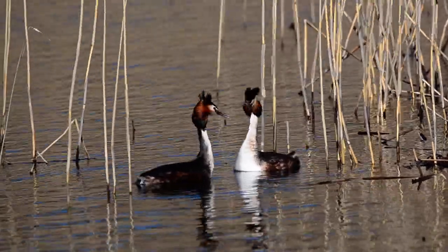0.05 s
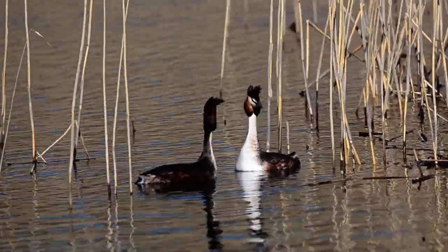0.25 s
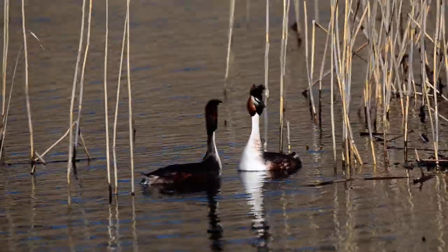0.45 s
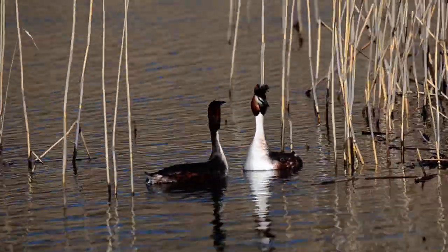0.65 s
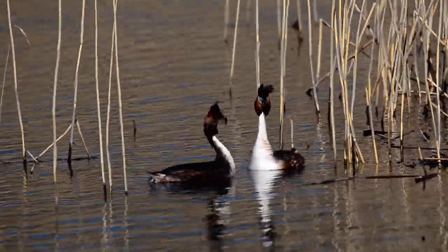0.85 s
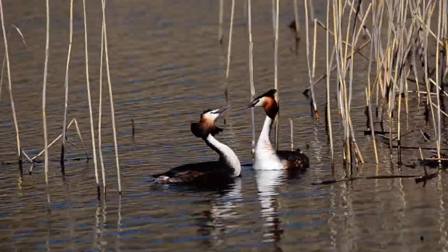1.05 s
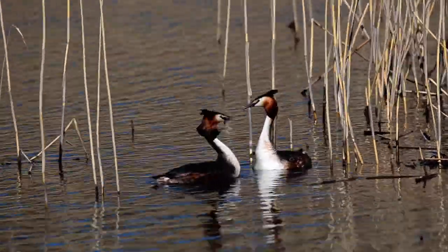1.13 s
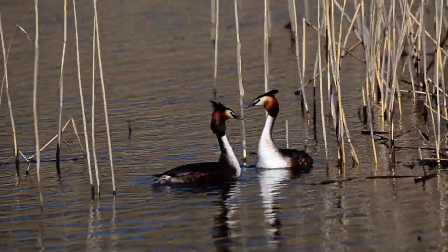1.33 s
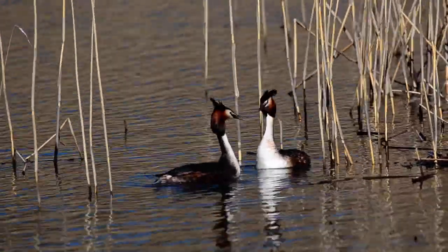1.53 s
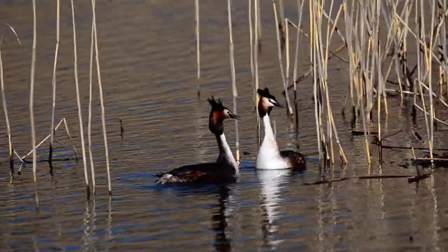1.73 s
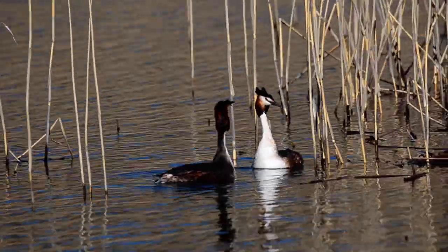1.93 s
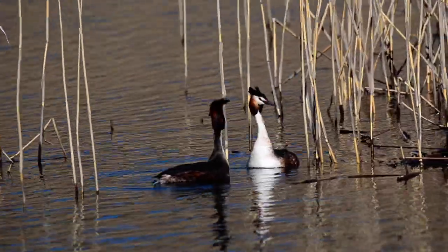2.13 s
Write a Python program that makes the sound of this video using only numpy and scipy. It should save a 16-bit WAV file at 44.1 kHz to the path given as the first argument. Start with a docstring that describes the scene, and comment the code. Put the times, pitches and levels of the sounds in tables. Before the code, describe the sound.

Three harsh rattling nasal grebe calls over a reedy pond, with wind thumping the microphone

```python
"""Grebes displaying on a reedy pond

Two great crested grebes give three harsh, rattling nasal calls, each a train of pulses arched in pitch.
Smoother nasal calls and thin whines from other birds overlap them, with two faint high whistles far off.
The reed bed scatters back a weak, dull tail of all the birds.
Wind strikes the microphone in short thumps, over a low rumble and a distant rush of shaped noise."""
import sys
import numpy as np
from scipy import signal
from scipy.fft import rfft, irfft
from scipy.io import wavfile

SR = 44100
rng = np.random.default_rng(int(sys.argv[2]) if len(sys.argv) > 2 else 0)


def transcribe(signal):
    """Save signal, clipped to [-1, 1], as a 16-bit WAV file at the path in sys.argv[1]."""
    frames = np.atleast_2d(signal).T
    limited = np.clip(frames, -1, 1)
    pcm = np.round(limited * 32767).astype(np.int16)
    wavfile.write(sys.argv[1], SR, pcm)


N = 97020
TIME = np.arange(N) / SR

# Strength of the low wind rumble: [start_s, level_db]
WIND_LEVEL = [(0, -46), (.15, -45), (.23, -32.5), (.32, -36.5), (.35, -35.5), (.43, -36.5), (.5, -23.5),
              (.63, -33.5), (.69, -40), (.84, -39.5), (.94, -30.5), (1.11, -35.5), (1.18, -28), (1.35, -39),
              (1.47, -42.5), (1.6, -35.5), (1.68, -41), (1.78, -45), (1.85, -35.5), (2.05, -43.5),
              (2.2, -39.5)]
# Relative spectra of the wind rumble and the distant rush: [freq_hz, level_db per Hz]
RUMBLE_SPECTRUM = [(15, -21.5), (35, 0), (70, 6.5), (130, 2.5), (220, -1.5), (330, -17), (550, -19.5),
                   (1000, -40.5), (3000, -74.5), (9000, -110)]
RUSH_SPECTRUM = [(60, 0), (250, -8.5), (550, -12.5), (900, 1), (1300, -5.5), (1700, -11), (2200, -17.5),
                 (3000, -28.5), (4000, -37.5), (5500, -45.5), (8000, -49), (15500, -53.5)]
# Thin whines of other birds: [start_s, pitch_hz, level_db]
WHINE_CURVES = [
    [(0, 2240, -63), (.09, 2173, -62.5), (.125, 2200, -60.5), (.145, 2020, -50.5), (.19, 1835, -53.5)],
    [(1.2, 2310, -60.5), (1.25, 2280, -73), (1.275, 2060, -55), (1.32, 1960, -51), (1.345, 2150, -57.5),
     (1.39, 2250, -60.5)],
]
# Eddies striking the microphone: [centre_s, swing_peak_db, pitch_hz, turbulence_db]
WIND_EDDIES = [(0.027, -31.5, 108, -37), (0.212, -18, 414, -22.5), (0.2161, -17.5, 266, -22.5),
               (0.2219, -14.5, 171.5, -31.5), (0.276, -23.5, 140, -37), (0.312, -22, 140, -29),
               (0.388, -15, 92, -31), (.397, -19.5, 187, -32), (0.446, -25, 417, -35.5),
               (0.4702, -8.5, 235, -23.5), (0.489, -18, 261, -20), (0.516, -17, 109.4, -30),
               (.5288, -9.5, 324, -21), (0.5322, -11, 687, -16), (.537, -13.5, 146.5, -19.5),
               (.556, -28.5, 450, -47), (.598, -13.5, 164, -24), (0.605, -15, 314, -28.5),
               (0.619, -20, 130, -40.5), (.635, -20, 110, -28), (.657, -20, 258, -29),
               (.756, -27, 129, -45), (0.812, -24.5, 189, -33), (0.861, -25.5, 151, -32),
               (0.874, -21, 122, -46), (0.892, -22.5, 140, -33.5), (0.906, -25.5, 278, -27),
               (0.922, -14.5, 110.6, -22.5), (0.936, -15.5, 101, -24), (.991, -19, 115, -26),
               (1.001, -14, 150, -29.5), (1.058, -18.5, 99, -39), (1.068, -19.5, 120, -28),
               (1.16, -22.5, 180, -34), (1.171, -17.5, 380, -28.5), (1.192, -23.5, 129.3, -23),
               (1.21, -20.5, 130, -34), (1.233, -21, 150, -26.5), (1.288, -26, 255, -27),
               (1.3, -19, 194, -34.5), (1.403, -32.5, 224, -38), (1.54, -19.5, 176, -26),
               (1.56, -27, 370, -33.5), (1.616, -24, 134, -33), (1.637, -21, 128, -42),
               (1.713, -31, 160, -51), (1.821, -28.5, 90, -59), (1.842, -30.5, 240, -48),
               (1.943, -30, 91, -52), (2.012, -26, 89, -55), (2.094, -27.5, 138, -56),
               (2.168, -30, 126, -47)]
# High whistles, far off: [start_s, pitch_hz, level_db before wavering]
WHISTLE_CURVES = [
    [(.185, 7450, -97), (.198, 7260, -88), (.212, 6600, -87), (.225, 6450, -74)],
    [(.555, 7050, -90), (.6, 7500, -111), (.645, 7600, -96), (.67, 7550, -99.5)],
]
# The three rattling calls: [start_s, pitch_hz before the pulse arch, level_db before throat colour,
# growl at half pitch (0-1)]
FIRST_RATTLE = [(.205, 900, -58, .1), (.26, 1005, -48.5, .1), (.305, 1055, -46.5, .05),
                (.345, 1025, -48, .05), (.425, 1068, -45.5, .1), (.49, 1045, -45.5, .05),
                (.53, 985, -47, .05), (.556, 890, -48.5, .1), (.595, 690, -56, .1)]
SECOND_RATTLE = [(.895, 880, -59, .2), (.945, 1025, -47, .1), (1.005, 1082, -44.5, .35),
                 (1.045, 1105, -45, .05), (1.095, 1112, -46, .65), (1.145, 1095, -46, .3),
                 (1.185, 1000, -47, .3), (1.207, 840, -51, .1), (1.24, 700, -59, .1)]
THIRD_RATTLE = [(1.56, 900, -56, .3), (1.585, 990, -45, .35), (1.61, 1035, -44, .3), (1.65, 1047, -44, .05),
                (1.69, 1037, -45.5, .6), (1.725, 1042, -44.5, .15), (1.765, 1035, -45.5, .65),
                (1.805, 1000, -46.5, .5), (1.84, 870, -56, .3)]
# Pulsing of each rattling call: [time of one gap_s, pulses_per_s, treble_db]
RATTLE_PULSES = [(0.3942, 49.3, -6.5), (1.057, 54, -.5), (1.6938, 49.8, 0.5)]
# Throat colour of the rattling calls: [freq_hz, gain_db]
RATTLE_THROAT = [(500, -30.5), (1050, -13), (1550, -7), (1800, 2.5), (2100, -2.5), (2600, -9.5),
                 (3150, -18.5), (3700, -8), (4200, -26.5), (4700, -31.5), (5250, -25), (6250, -24.5),
                 (7200, -35.5), (8000, -49), (8900, -43.5), (10500, -57), (12500, -49), (15000, -62.5)]
# Nasal calls of other birds: [start_s, pitch_hz before flutter, level_db before flutter and throat colour]
REPLY_CURVES = [
    [(.28, 878, -57.5), (.32, 904, -51), (.385, 945.4, -48), (.42, 830, -53), (.46, 708, -56.5)],
    [(1.44, 880, -58.5), (1.475, 912, -51.5), (1.51, 922.7, -50.5), (1.555, 911.5, -48.5),
     (1.595, 795, -51)],
]
# Throat colour of those nasal calls: [freq_hz, gain_db]
NASAL_THROAT = [(900, -6.5), (1500, 7), (1850, 2), (2750, -13), (3700, -19), (4600, -29), (5500, -45.5),
                (7500, -53.5)]
# Gain of the upper partials of each nasal call: [gain_db]
REPLY_TREBLE = [-3.5, -0.5]

RUSH_DB, RUSH_SWAY_DB = -45.5, 0.35
WHINE_JITTER, WHISTLE_JITTER = 0.018, .005  # rms shares of the pitch
WHISTLE_WAVER_DB = 2
SWIRL_RISE_S, SWIRL_FALL_S = 0.0039, 0.0078
# the swirl's upper limit is a base plus a share of the eddy's pitch
SWIRL_BASE_HZ, SWIRL_PITCH_SHARE, SWIRL_LOW_HZ = 202.3, 0.82, 39

# pulse times are shares of one pulse cycle; GAP_SHARE lies on each side of the gap's centre
GAP_SHARE, PULSE_EDGE, UPPER_EDGE = .035, .18, 0.092
GAP_DB = -13  # lower partials between pulses; the upper ones fall silent
# arch depth is a share of pitch; the skew tops it early; at the pivot height it leaves pitch unchanged
PULSE_ARCH, ARCH_SKEW, ARCH_PIVOT = .105, .9, 0.94
PULSE_WANDER, JITTER = .003, .005  # slow and fast rms shares of the pitch
SHIMMER_DB, RASP_DB = 1.12, -24
FULL_VOICE_HZ, TREBLE_DB_PER_OCTAVE = 1050, 19  # the voice dulls as its pitch sags

REPLY_FLUTTER_PER_S, REPLY_FLUTTER, REPLY_FLUTTER_DB, REPLY_JITTER = 78, .025, 4, .012
ECHO_DB, ECHO_T60_S, ECHO_CUT_HZ = -14.5, 0.38, 3000
CUTOFF_HZ, FADE_S = 15700, .004


def from_db(db):
    """Decibels to gain."""
    return 10 ** (np.asarray(db) / 20)


def rms_one(x):
    """Scale to unit rms."""
    return x / np.sqrt(np.mean(x ** 2) + 1e-20)


def in_time(rows):
    """Interpolate each column of a curve to every sample."""
    start_s, *columns = np.transpose(rows)
    return [np.interp(TIME, start_s, column) for column in columns]


def during(rows):
    """One while a call lasts, with 5 ms fades inside its ends."""
    from_edge_s = np.minimum(TIME - rows[0][0], rows[-1][0] - TIME)
    return np.clip(from_edge_s / .005, 0, 1)


def gain_at(points, hz):
    """Gain of a spectrum at the given frequencies, read along a log frequency axis."""
    freq_hz, db = np.transpose(points)
    return from_db(np.interp(np.log(hz + 1), np.log(freq_hz), db))


def noise(spectrum):
    """White noise coloured by a spectrum, at unit rms."""
    bins = rfft(rng.standard_normal(N))
    bin_hz = np.arange(N // 2 + 1) * SR / N
    return rms_one(irfft(bins * gain_at(spectrum, bin_hz), N))


def filtered(x, hz, kind="low", order=2):
    """Butterworth filter."""
    safe_hz = np.clip(hz, 10, SR / 2 - 2000)
    return signal.sosfilt(signal.butter(order, safe_hz, kind, fs=SR, output="sos"), x)


def drift(rate_hz):
    """Random wander of unit rms, no faster than about the given rate."""
    settled = filtered(rng.standard_normal(2 * N), rate_hz)[N:]
    return rms_one(settled)


def wind_rumble():
    """Low noise whose level rises and falls with the wind."""
    level_db, = in_time(WIND_LEVEL)
    return from_db(level_db) * noise(RUMBLE_SPECTRUM)


def distant_rush():
    """The far rush of the air: broad noise that sways slightly in level."""
    return from_db(RUSH_DB + RUSH_SWAY_DB * drift(24)) * noise(RUSH_SPECTRUM)


def thin_call(rows, jitter, waver_db):
    """A far whine or whistle, of which one partial of unsteady pitch carries to the microphone."""
    hz, db = in_time(rows)
    phase = 2 * np.pi * np.cumsum(hz * (1 + jitter * drift(250))) / SR
    level = from_db(db + waver_db * drift(80))
    return np.sqrt(2) * np.sin(phase) * level * during(rows)


def buffets():
    """Each eddy is one swing of pressure with a brief swirl of turbulence; small eddies sound higher."""
    out = np.zeros(N)
    for centre_s, swing_db, hz, swirl_db in WIND_EDDIES:
        near = np.abs(TIME - centre_s) < .08
        t = TIME[near] - centre_s
        u = 2 * np.pi * hz * t
        swing = u * np.exp((1 - np.minimum(u * u, 100)) / 2)  # peaks at one
        white = rng.standard_normal(SR // 5)
        swirl = filtered(white, SWIRL_BASE_HZ + SWIRL_PITCH_SHARE * hz, order=4)
        swirl = rms_one(filtered(swirl, SWIRL_LOW_HZ, "high"))[-len(t):]
        envelope = np.exp(-np.maximum(-t / SWIRL_RISE_S, t / SWIRL_FALL_S))
        out[near] += from_db(swing_db) * swing + from_db(swirl_db) * swirl * envelope
    return out


def rattling_call(rows, gap_s, pulses_per_s, treble_db, count=26):
    """Pulses, each arching in pitch; period doubling adds growling lines between the harmonics."""
    hz, db, growl = in_time(rows)
    cycle = (TIME - gap_s) * pulses_per_s % 1
    inside = np.minimum(cycle, 1 - cycle) - GAP_SHARE
    arch = PULSE_ARCH * (np.sin(np.pi * cycle ** ARCH_SKEW) - ARCH_PIVOT)
    hz = hz * (1 + arch + PULSE_WANDER * drift(31.3) + JITTER * drift(550))
    phase = 2 * np.pi * np.cumsum(hz) / SR

    low_gate = from_db(GAP_DB * (1 - np.clip(inside / PULSE_EDGE, 0, 1)))
    brightness = from_db(TREBLE_DB_PER_OCTAVE * np.log2(hz / FULL_VOICE_HZ))
    high_gate = low_gate * np.clip(inside / UPPER_EDGE, 0, 1) * brightness

    voice = from_db(RASP_DB + treble_db) * high_gate * noise(RATTLE_THROAT)  # breathy rasp
    for k in range(1, count + 1):
        harmonic = k / 2  # odd k falls midway between harmonics
        upper = harmonic > 2
        gate = high_gate * from_db(treble_db) if upper else low_gate
        partial = np.sqrt(2) * np.sin(harmonic * phase + 2 * np.pi * rng.random())
        if k % 2:
            share = growl
        else:
            share = 1 - growl / 2 if upper else 1
        colour = gain_at(RATTLE_THROAT, harmonic * hz)
        voice += partial * share * gate * colour * from_db(SHIMMER_DB * drift(90))
    return voice * from_db(db) * during(rows)


def reply(rows, treble_db, count=6):
    """A smoother nasal call: harmonics with a quick flutter in pitch and level."""
    hz, db = in_time(rows)
    flutter_hz = REPLY_FLUTTER_PER_S * (1 + 0.05 * drift(23))
    flutter = np.sin(2 * np.pi * np.cumsum(flutter_hz) / SR)
    hz = hz * (1 + REPLY_FLUTTER * flutter + REPLY_JITTER * drift(600))
    phase = 2 * np.pi * np.cumsum(hz) / SR
    voice = np.zeros(N)
    for k in range(1, count + 1):
        colour = gain_at(NASAL_THROAT, k * hz) * from_db(treble_db * (k > 2))
        voice += colour * np.sin(k * phase)
    return np.sqrt(2) * voice * from_db(db + REPLY_FLUTTER_DB * flutter) * during(rows)


def reeds(x):
    """A weak dull tail scattered back from the reed bed: convolution with decaying noise."""
    tail = filtered(rng.standard_normal(N), ECHO_CUT_HZ) * from_db(-60 * TIME / ECHO_T60_S)
    unit_tail = tail / np.sqrt(np.sum(tail ** 2))
    return from_db(ECHO_DB) * signal.fftconvolve(x, unit_tail)[:N]


def scene():
    """Birds over the water, wind on the microphone and the far rush of the air."""
    wind = wind_rumble() + buffets()
    rush = distant_rush()
    birds = np.zeros(N)
    for rows in WHINE_CURVES:
        birds += thin_call(rows, WHINE_JITTER, waver_db=0)
    for rows in WHISTLE_CURVES:
        birds += thin_call(rows, WHISTLE_JITTER, WHISTLE_WAVER_DB)
    for rows, pulses in zip((FIRST_RATTLE, SECOND_RATTLE, THIRD_RATTLE), RATTLE_PULSES):
        birds += rattling_call(rows, *pulses)
    for rows, treble_db in zip(REPLY_CURVES, REPLY_TREBLE):
        birds += reply(rows, treble_db)
    return (birds + reeds(birds) + wind + rush)[None]


def record(dry):
    """Ease both ends, then cut the top steeply with an elliptic low-pass."""
    ease = np.clip(np.minimum(TIME, TIME[-1] - TIME) / FADE_S, 0, 1)
    top_cut = signal.ellip(10, .1, 80, CUTOFF_HZ, fs=SR, output="sos")
    return signal.sosfilt(top_cut, dry * ease)


dry = scene()
out = record(dry)
transcribe(out)
```